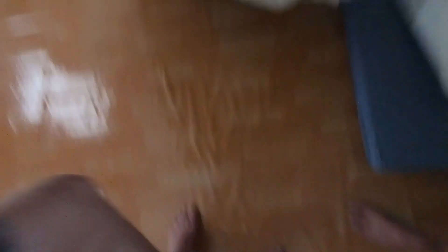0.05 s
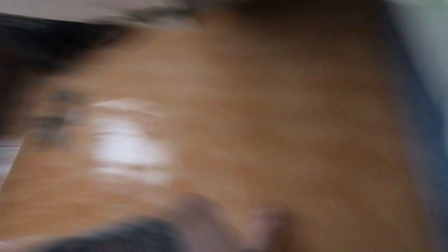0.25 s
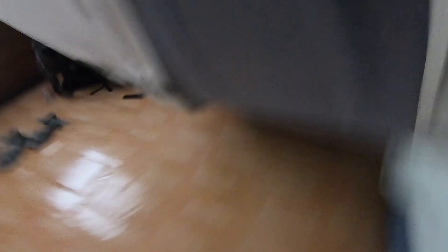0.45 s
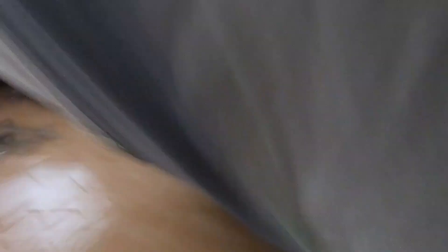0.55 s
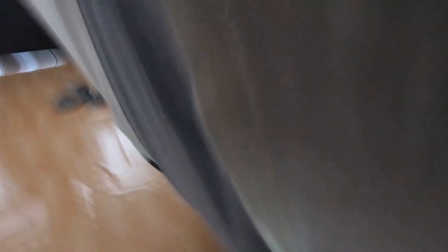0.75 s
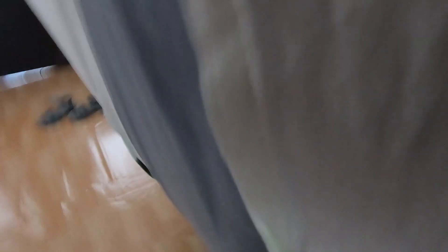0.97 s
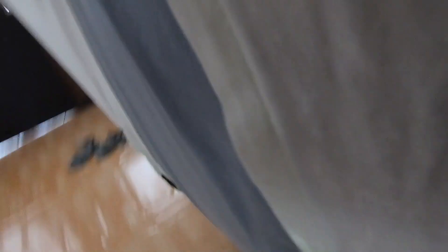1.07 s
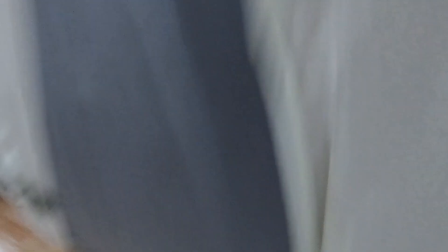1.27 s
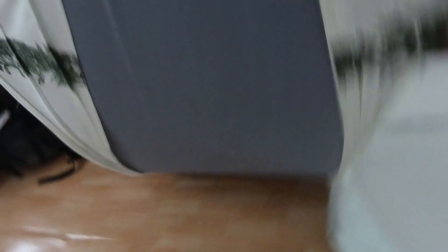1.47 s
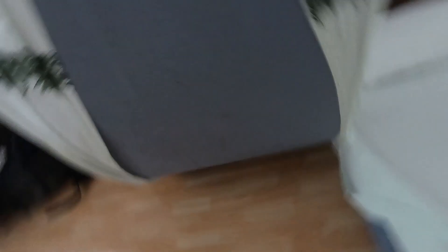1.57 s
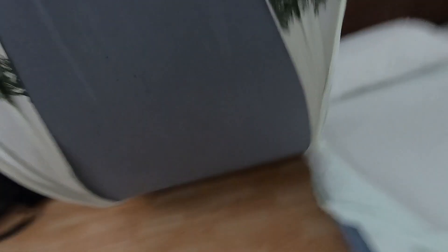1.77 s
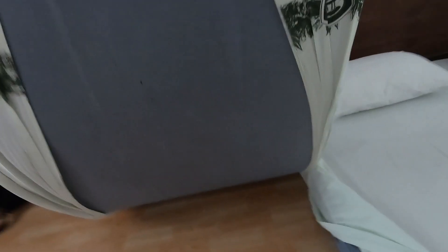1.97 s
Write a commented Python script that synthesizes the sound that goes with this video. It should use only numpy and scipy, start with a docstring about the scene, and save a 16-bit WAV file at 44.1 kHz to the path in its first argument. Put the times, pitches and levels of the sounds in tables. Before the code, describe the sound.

Close to the microphone, a foam mattress in a cotton sheet is lifted with dull thuds and a sharp wooden knock. Fabric slides, pops taut and keeps rustling while the foam flops softly in a small room.

```python
"""Foam mattress lifted off a wooden floor

A thin mattress in a cotton sheet is heaved up close by. The foam flops with soft thuds and pushes air.
The sheet rustles and swishes as cloth slides, and snaps as folds pull taut.
One sharp knock early in the lift rings the wood; the small room answers briefly."""
import sys
import numpy as np
from scipy import signal
from scipy.fft import rfft, irfft
from scipy.io import wavfile

SR = 44100
rng = np.random.default_rng(int(sys.argv[2]) if len(sys.argv) > 2 else 0)


def pcm_store(signal):
    """Save signal as 16-bit PCM."""
    levels = np.round(np.clip(np.atleast_2d(signal), -1, 1) * 32767)
    wavfile.write(sys.argv[1], SR, levels.astype(np.int16).T)


N = 89037
TIME_S = np.arange(N) / SR

# air rumble (time [s], relative level [dB])
RUMBLE_LEVEL = [(0.0, -44), (0.16, -44), (0.2, -53), (0.24, -35.5), (0.29, -36), (0.38, -21.5), (0.4, -30),
                (0.49, -25), (0.54, -24.5), (0.57, -26), (0.83, -46.5), (1.12, -44.5), (1.13, -36),
                (1.28, -30), (1.35, -45), (1.41, -28), (1.53, -45), (1.61, -30.5), (1.76, -80), (1.82, -45),
                (1.87, -55), (2.02, -38)]
# air rumble (frequency [Hz], density [dB])
RUMBLE_SPECTRUM = [(10,-18.5),(25,-3),(45,2.5),(75,-4.5),(110,-10.5),(170,-24),(400,-87),(1000,-103)]
# foam flutter (time [s], relative level [dB])
FLUTTER_LEVEL = [(0,-54),(.2,-56.5),(.25,-40.5),(.31,-49.5),(.4,-39),(.47,-28.5),(.5,-43),(.56,-36),(.59,-51),(.64,-37.5),(.74,-68.5),(1.0,-58.5),(1.18,-57),(1.21,-45.5),(1.32,-41),(1.35,-52),(1.4,-44),(1.53,-40),(1.56,-61.5),(1.64,-49),(1.69,-71),(1.89,-79),(1.93,-50),(2.02,-56.5)]
# foam flutter (frequency [Hz], density [dB])
FLUTTER_SPECTRUM = [(30,-34),(80,0),(140,3),(210,-1.5),(280,-9),(325,-17),(400,-50),(1500,-85)]
# foam flops (start [s], level [dB], pitch [Hz], swell [s])
THUDS = [(0.319,-27.5,55.9,0.0088),(0.361,-29,45,0.011),(0.391,-27.5,70,.005),(0.405,-22,220,0.0019),(0.438,-22,170,0.0026),(0.4514,-16,144.5,0.0072),(.473,-22.5,214,0.0035),(0.619,-22,173,0.0026),(1.135,-27.5,57,0.0073),(1.205,-26.5,102,0.0084),(1.288,-27,110,0.0094),(1.313,-28,130,0.0061),(1.377,-26,104,0.0076),(1.3972,-22.5,128,0.0044),(1.4082,-18.5,135,0.0038),(1.4317,-23.5,96,0.0039),(1.463,-25.5,154,0.0081),(1.495,-29,153,0.0072),(1.516,-31.5,148,0.0088),(1.63,-28,87,0.004),(1.9035,-35.5,171.7,0.0094),(1.902,-45,75,0.0084)]

# rustle body (time [s], level [dB])
RUSTLE_LEVEL = [(0,-57),(.12,-47.5),(.17,-59),(.33,-57.5),(.38,-50.5),(.42,-46),(.49,-51),(.58,-53.5),(.61,-51),(.71,-48),(.8,-56),(.92,-62),(1.02,-52.5),(1.06,-46),(1.14,-43.5),(1.17,-53.5),(1.3,-54),(1.42,-54.5),(1.55,-61.5),(1.62,-59),(1.7,-66),(1.81,-62),(1.89,-64.5),(2.02,-57.5)]
# rustle body (frequency [Hz], density [dB])
RUSTLE_SPECTRUM = [(100,6.5),(270,7),(420,-2),(750,1),(1050,-2.5),(1450,-2.5),(2000,-7.5),(2800,-19.5),(4500,-27),(9000,-62)]
# rustle treble (time [s], level [dB])
TREBLE_LEVEL = [(0,-62.5),(.04,-60.5),(.16,-68),(.22,-64.5),(.34,-65.5),(.42,-55.5),(.49,-62.5),(.58,-62),(.61,-59.5),(.69,-64),(.77,-67.5),(.86,-74),(.93,-73.5),(1.02,-73),(1.06,-60),(1.13,-56),(1.17,-63.5),(1.3,-63),(1.46,-64),(1.56,-75),(1.61,-64.5),(1.67,-72),(1.78,-70.5),(1.89,-75.5),(1.95,-69.5),(2.0,-66)]
# rustle treble (frequency [Hz], density [dB])
TREBLE_SPECTRUM = [(1000,-6),(2000,-0.5),(2900,-1.5),(3750,1.5),(4500,-2),(5800,-6.5),(7000,-5.5),(8200,-12.5),(9300,-20),(11000,-39),(16000,-53)]
# faint high hiss, about 9-15 kHz (frequency [Hz], density [dB])
HISS_SPECTRUM = [(5000,-30),(9000,-8),(11200,-11),(12600,3),(14500,-4),(16000,-12)]
# cloth sliding on cloth (start [s], length [s], level [dB])
SWISHES = [(.617,0.041,-40.5),(1.095,0.055,-57.5)]
# swish (frequency [Hz], density [dB])
SWISH_SPECTRUM = [(200,-2),(700,3.5),(1400,-1.5),(1850,2),(2400,-3),(3400,-9.5),(4100,4),(5000,-10.5),(6000,-2),(7000,-17),(8300,-13),(9700,-33),(12000,-42),(16000,-51)]
# hollow scrape of the dragged sheet (start [s], length [s], level [dB])
DRAGS = [(.945,.115,-54)]
# drag (frequency [Hz], density [dB])
DRAG_SPECTRUM = [(150,-17),(280,10),(600,-11),(1450,-10),(1790,5.5),(2120,-22),(2450,-1.5),(3300,-9),(4150,0.5),(5050,-21),(5900,-4),(6800,-23),(8200,-22),(10000,-55)]
# soft sweeps of the sheet (start [s], length [s], level [dB])
BRUSHES = [(.04,0.13,-53.5),(1.3,.17,-54)]
# brush (frequency [Hz], density [dB])
BRUSH_SPECTRUM = [(200,-6.5),(700,-1),(1600,-3),(2600,-3),(3800,-2.5),(5800,-8),(7800,-7.5),(9200,-18.5),(11000,-35),(16000,-54)]
# hem zipping over the floor (start [s], length [s], level [dB])
ZIPS = [(.68,0.015,-59),(.778,0.025,-58),(.81,0.038,-67)]
# zip (frequency [Hz], density [dB])
ZIP_SPECTRUM = [(1500,-26),(4000,-12),(5700,-1.5),(7000,-7.5),(8500,-28),(10000,-39)]
# folds snapping taut (start [s], pop level [dB], initial pitch [Hz], crackle level [dB])
SNAPS = [(0.243,-29,398,-48),(.4005,-42.5,906,-32),(0.51,-52,500,-49),(1.056,-24.5,493,-52),(1.09,-31,524,-59),(1.139,-29.5,460,-45),(1.69,-66,900,-58),(1.808,-59,970,-54)]
# snap crackle (frequency [Hz], density [dB])
CRACKLE_SPECTRUM = [(200,10.5),(800,-7),(1400,5.5),(1950,-6.5),(2450,2),(3200,-6),(4200,-17),(6500,-18.5),(8500,-23),(11000,-45),(16000,-57)]
# rubbed-fabric chirps (start [s], length [s], level [dB], pitch [Hz], width [Hz])
SQUEAKS = [(.905,0.051,-51,390,142),(0.971,0.095,-55.5,1790,49.3),(1.178,0.033,-44,1410,102),(1.206,0.034,-52.5,1380,111),(1.59,0.03,-59,1330,49.2)]

# mattress scuffing the floor (start [s], length [s], level [dB])
SCUFFS = [(.51,0.027,-36)]
# scuff (frequency [Hz], density [dB])
SCUFF_SPECTRUM = [(100,-1.5),(300,-12),(700,1.5),(1500,-7.5),(3000,-21),(6000,-28),(10000,-69)]
# knock impacts (start [s], crack level [dB], decay [s], click level [dB])
IMPACTS = [(.527,-24,0.011,-36.5),(0.5371,-19.5,0.0051,-62),(0.55,-32.5,0.013,-49)]
# impact crack (frequency [Hz], density [dB])
CRACK_SPECTRUM = [(100,18),(350,3.5),(700,0),(1400,-3.5),(2000,-5),(3300,-16.5),(4300,-11.5),(5100,-28),(6000,-9.5),(8200,-37),(9300,-44),(11200,-48),(12800,-31),(15500,-44)]
# bright impact click (frequency [Hz], density [dB])
CLICK_SPECTRUM = [(2000,1),(4200,10),(6000,6),(8200,4),(9500,-11),(11200,-11),(12800,-4),(15500,-7)]
# floor and bed frame modes (frequency [Hz], relative level [dB], T60 [s])
WOOD_MODES = [(377,-3,.18),(483,1,.19),(552,-2,.16),(687,-1,.15),(954,-3,.13),(1145,-5,.13),(1230,-1,.13),(1353,-3,.13),(1560,-4,.13),(1679,-4,.13),(1918,-6,.13),(2740,-10,.12),(4020,-23,.9),(4200,-11,.11),(6200,-25,.8)]
# air pushed by the knock (start [s], level [dB], pitch [Hz], swell [s])
PUSHES = [(0.5279,-9,73,0.0073),(.546,-14.5,20.6,0.02)]

# room decay (frequency [Hz], T60 [s])
ROOM_T60 = [(100,0.52),(500,0.49),(2000,0.35),(6000,0.13),(14000,0.29)]
# background noise (frequency [Hz], density [dB])
BACKGROUND_SPECTRUM = [(20,2.5),(50,-3.5),(95,-14.5),(190,-9),(300,-15.5),(500,-22.5),(1500,-23.5),(3000,-38),(7000,-40.5),(10000,-48.5),(16000,-79)]


def foam():
    """Bending foam stirs the air, flutters and flops."""
    rumble = amp(-3.5) * envelope(RUMBLE_LEVEL) * noise(RUMBLE_SPECTRUM)
    flutter = amp(1) * envelope(FLUTTER_LEVEL) * noise(FLUTTER_SPECTRUM)
    return rumble + flutter + sum(damped_swing(*thud) for thud in THUDS)


def sheet(hiss_db=-19.5, hiss_end_s=0.65, hiss_fade_s=0.06):
    """Cotton rustles throughout and slides in short strokes; a faint high hiss lies over the start."""
    body = envelope(RUSTLE_LEVEL) * fibre_slips(RUSTLE_SPECTRUM, grain_db=2.5, clump_db=3.0)
    hiss = amp(hiss_db) * np.clip((hiss_end_s - TIME_S) / hiss_fade_s, 0, 1) * noise(HISS_SPECTRUM)
    treble = envelope(TREBLE_LEVEL) * (fibre_slips(TREBLE_SPECTRUM, grain_db=3.5, clump_db=-1.0) + hiss)
    swishes = trapezoids(SWISHES) * noise(SWISH_SPECTRUM)
    drags = trapezoids(DRAGS) * noise(DRAG_SPECTRUM)
    brushes = arches(BRUSHES) * (noise(BRUSH_SPECTRUM) + hiss)
    zips = arches(ZIPS) * noise(ZIP_SPECTRUM)
    return body + treble + swishes + drags + brushes + zips


def fibre_slips(spectrum, grain_db, clump_db):
    """Dense tiny slips, uneven in size, arriving in clumps."""
    slips = rng.standard_normal(N) * amp(grain_db * np.minimum(rng.exponential(1, N), 6))
    return shape(slips * amp(clump_db * drift(rate_hz=76)), spectrum)


def snaps(rise_s=0.0016, decay_s=0.003, slacken_s=0.0083):
    """A fold pulled taut pops and crackles; the pitch falls as it slackens."""
    out = np.zeros(N)
    crackle = noise(CRACKLE_SPECTRUM)
    for start_s, pop_db, hz, crackle_db in SNAPS:
        cycles = hz * slacken_s * np.log1p(since(start_s) / slacken_s)
        pop = amp(pop_db) * np.sin(2 * np.pi * cycles)
        out += burst(start_s, rise_s, decay_s) * (pop + amp(crackle_db) * crackle)
    return out


def squeaks(roughness=0.94):
    """Fabric sticks and slips, rough in strength and timing about one pitch."""
    out = np.zeros(N)
    for start_s, length_s, db, hz, width_hz in SQUEAKS:
        slip = 1 + roughness * (drift(width_hz) + 1j * drift(width_hz))
        tone = (slip * np.exp(2j * np.pi * hz * TIME_S)).real
        out += arches([(start_s, length_s, db)]) * unit_rms(tone)
    return out


def knock(rise_s=0.0017, ring_db=-37):
    """A scuff, then a cluster of impacts that crack and ring the wood."""
    crack, click = noise(CRACK_SPECTRUM), noise(CLICK_SPECTRUM)
    hits = sum((amp(crack_db) * crack + amp(click_db) * click) * burst(start_s, rise_s, decay_s)
               for start_s, crack_db, decay_s, click_db in IMPACTS)
    age_s = since(IMPACTS[0][0])
    modes = sum(amp(db - 60 * age_s / t60_s) * np.sin(2 * np.pi * (hz * age_s + rng.random()))
                for hz, db, t60_s in WOOD_MODES)
    ring = amp(ring_db) * np.minimum(age_s / rise_s, 1) * modes
    scuff = arches(SCUFFS) * noise(SCUFF_SPECTRUM)
    return scuff + hits + ring


def air_push():
    """Low pressure swings from air displaced by the knock."""
    return -sum(damped_swing(*push) for push in PUSHES)


def room(x, tap_density=0.1, predelay_s=0.006):
    """Sparse reflections, each band dying at its own rate."""
    taps = rng.standard_normal(SR) * (rng.random(SR) < tap_density) * (TIME_S[:SR] > predelay_s)
    hz, age_s, bands = signal.stft(taps, SR, nperseg=256)
    decay = amp(-60 * age_s / lookup(ROOM_T60, hz)[:, None])
    tail = signal.istft(bands * decay, SR, nperseg=256)[1]
    return signal.fftconvolve(x, tail / np.linalg.norm(tail))[:N]


def background(level_db=-63):
    """Faint steady noise, mostly low."""
    return amp(level_db) * noise(BACKGROUND_SPECTRUM)


def amp(db):
    """Decibels to gain."""
    return 10 ** (np.asarray(db) / 20)


def unit_rms(x):
    """Scale to rms 1."""
    return x / np.sqrt(np.mean(x ** 2) + 1e-20)


def lookup(table, hz):
    """Interpolate over log frequency."""
    table_hz, values = np.transpose(table)
    return np.interp(np.log(hz + 1), np.log(table_hz + 1), values)


def shape(x, spectrum):
    """Filter by a spectrum table; rms 1."""
    gain = amp(lookup(spectrum, np.fft.rfftfreq(N, 1 / SR)))
    return unit_rms(irfft(rfft(x) * gain, N))


def noise(spectrum):
    """Steady shaped noise; rms 1."""
    return shape(rng.standard_normal(N), spectrum)


def drift(rate_hz):
    """Smooth random wander; rms 1."""
    rolloff = 1 + (np.fft.rfftfreq(N, 1 / SR) / rate_hz) ** 4
    return unit_rms(irfft(rfft(rng.standard_normal(N)) / rolloff, N))


def since(start_s):
    """Elapsed seconds, zero before the start."""
    return np.maximum(TIME_S - start_s, 0)


def envelope(table):
    """Level curve to gain per sample."""
    return amp(np.interp(TIME_S, *np.transpose(table)))


def damped_swing(start_s, db, hz, swell_s):
    """A sine that swells and dies within a few cycles."""
    age_s = since(start_s)
    swell = age_s / swell_s
    return amp(db) * swell ** 3 * np.exp(3 * (1 - swell)) * np.sin(2 * np.pi * hz * age_s)


def trapezoids(strokes, rise_s=0.017, fall_s=0.022):
    """Linear attack, hold and release per stroke."""
    gain = np.zeros(N)
    for start_s, length_s, db in strokes:
        attack = np.clip(since(start_s) / rise_s, 0, 1)
        release = np.clip((start_s + length_s - TIME_S) / fall_s + 0.5, 0, 1)
        gain += amp(db) * attack * release
    return gain


def arches(strokes):
    """Symmetric swell and fade per stroke."""
    return sum(amp(db) * np.sin(np.pi * np.clip(since(start_s) / length_s, 0, 1)) ** 2
               for start_s, length_s, db in strokes)


def burst(start_s, rise_s, decay_s):
    """Smooth attack, exponential decay."""
    attack = np.sin(np.pi / 2 * np.minimum(since(start_s) / rise_s, 1)) ** 2
    return attack * np.exp(-since(start_s + rise_s) / decay_s)


def scene(room_db=-17):
    """Mono mix; air and background stay dry."""
    direct = sheet() + snaps() + squeaks() + knock()
    air = foam() + air_push()
    return (direct + air + background() + amp(room_db) * room(direct))[None]


def record(dry, cutoff_hz=15600):
    """Steep elliptic low-pass."""
    return signal.sosfilt(signal.ellip(12, 0.1, 80, cutoff_hz, fs=SR, output="sos"), dry)


dry = scene()
out = record(dry)
pcm_store(out)
```